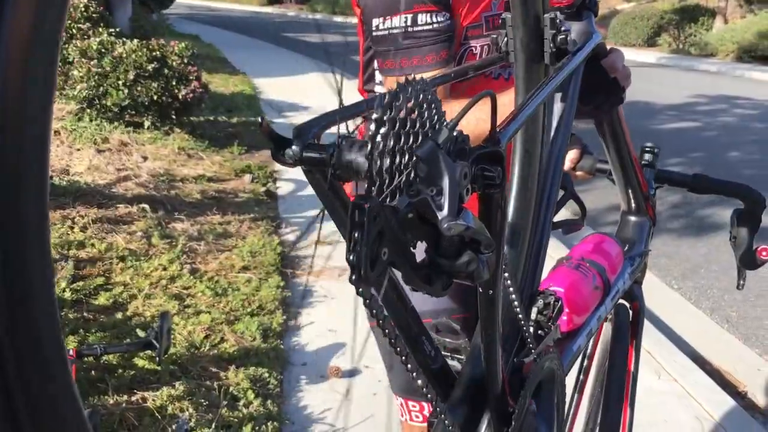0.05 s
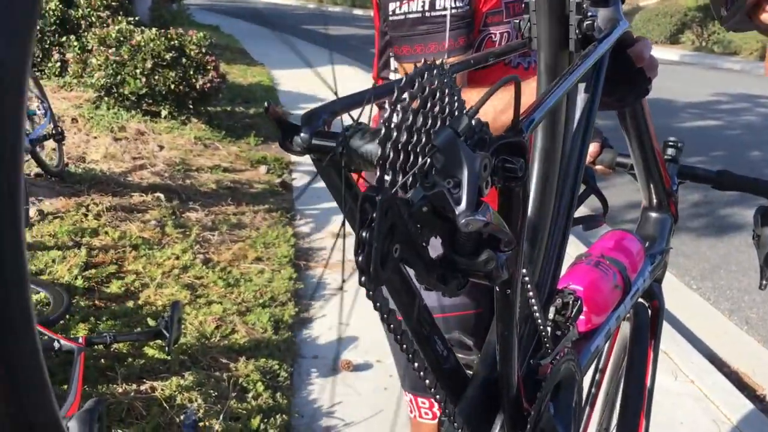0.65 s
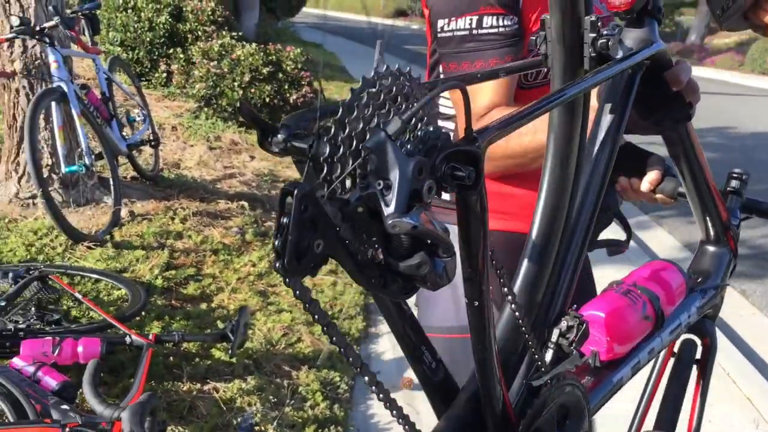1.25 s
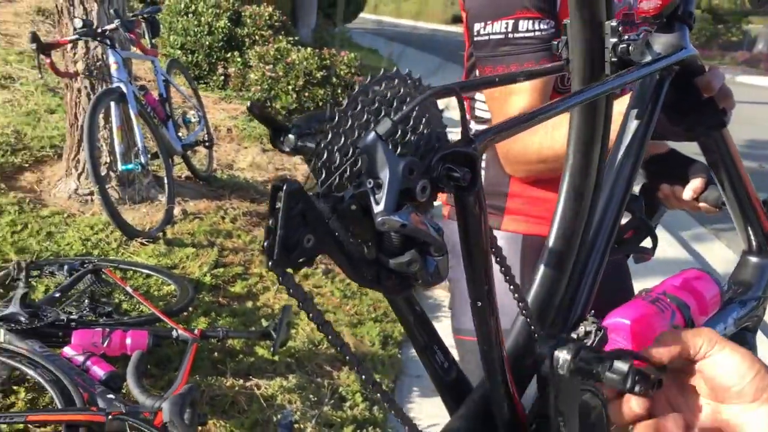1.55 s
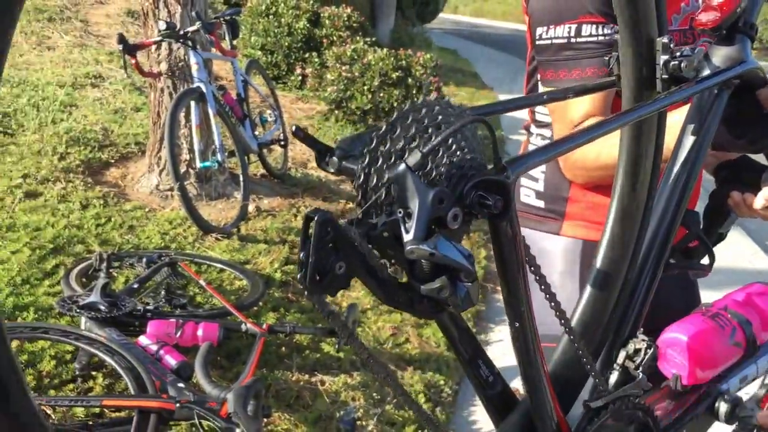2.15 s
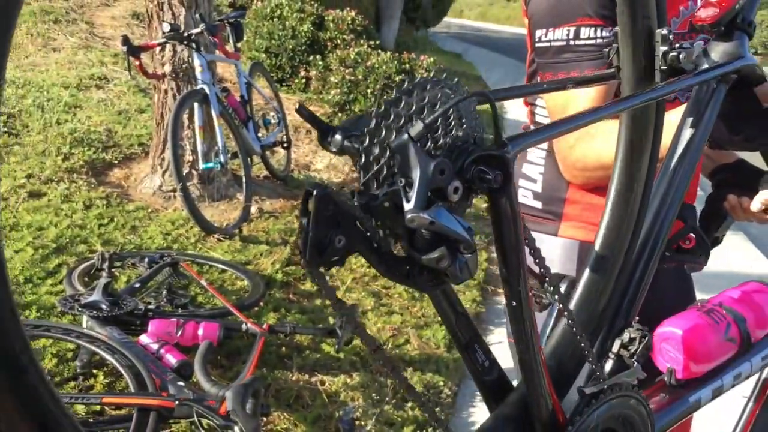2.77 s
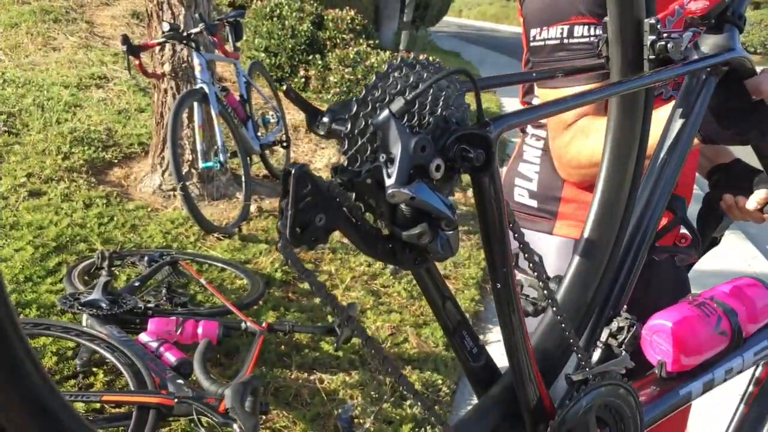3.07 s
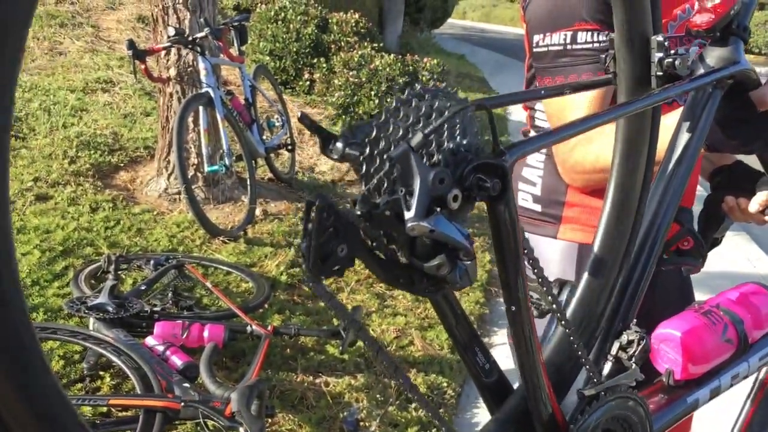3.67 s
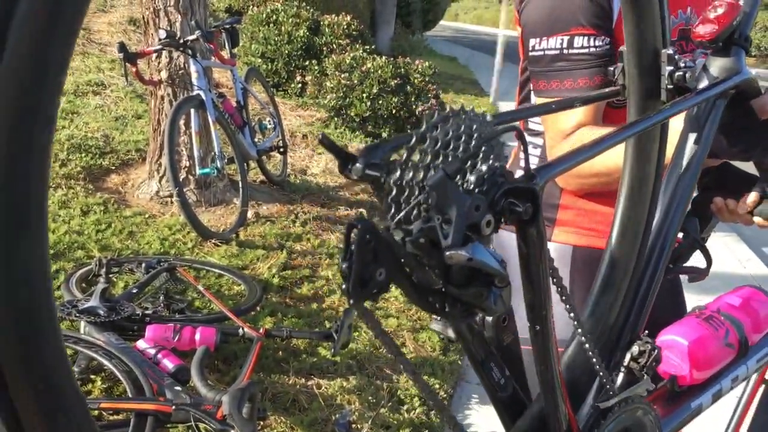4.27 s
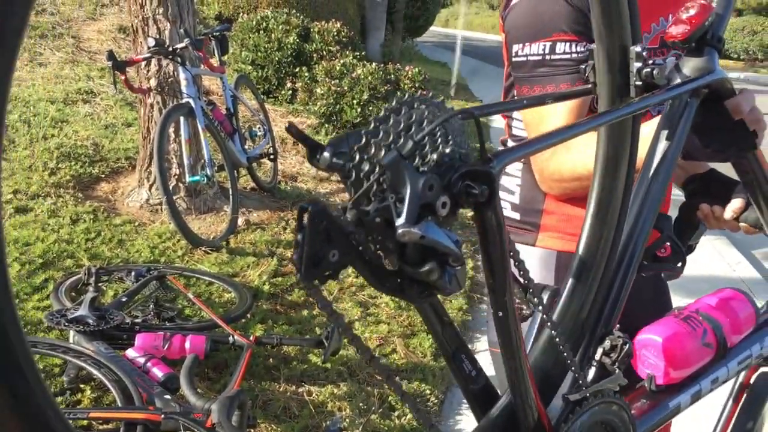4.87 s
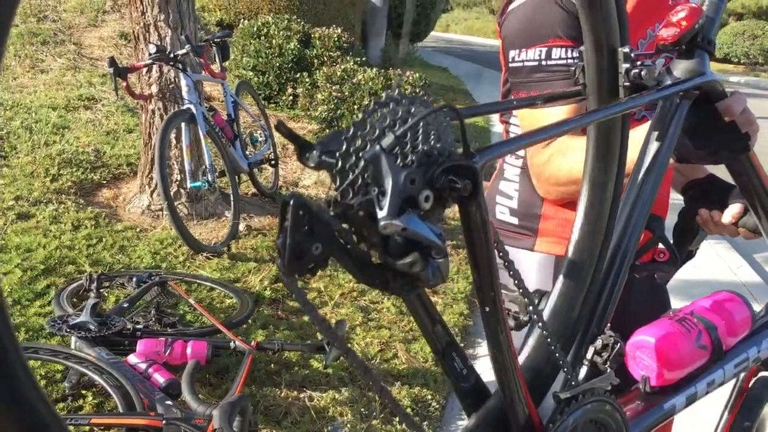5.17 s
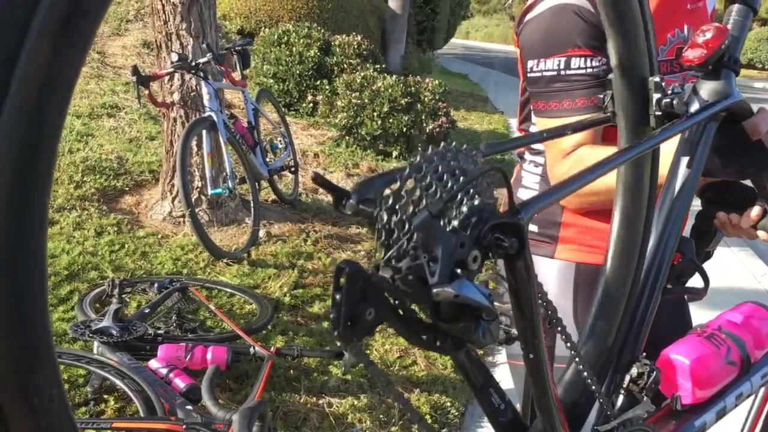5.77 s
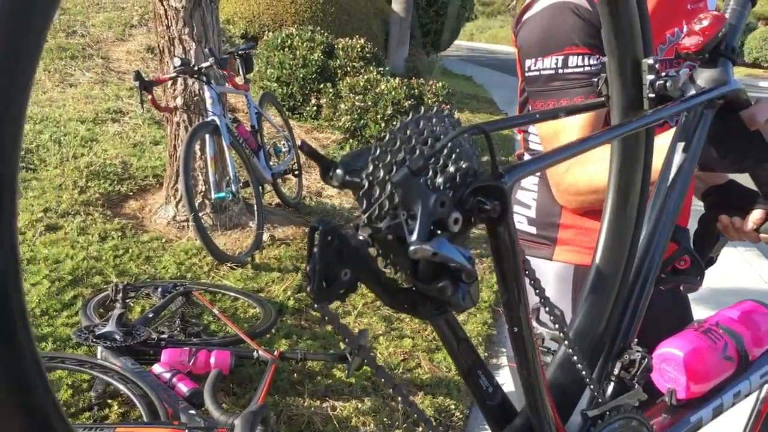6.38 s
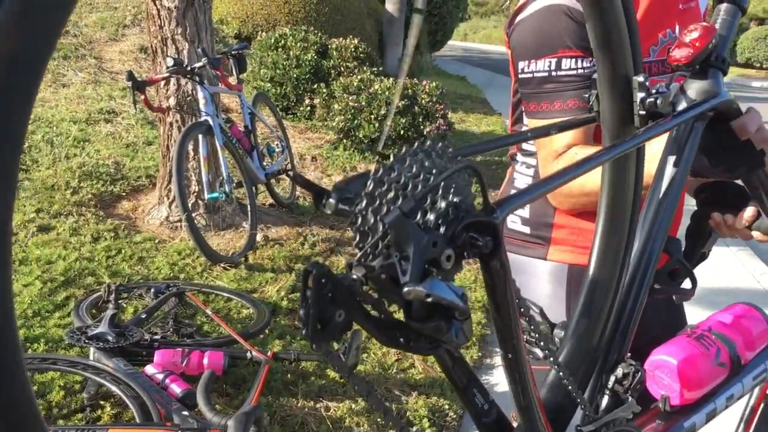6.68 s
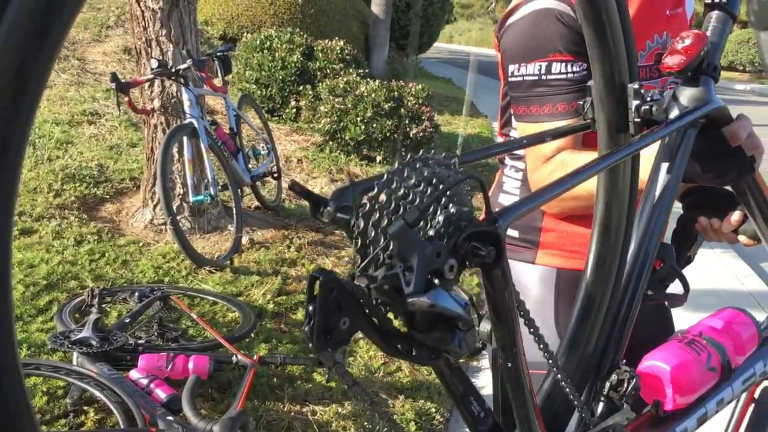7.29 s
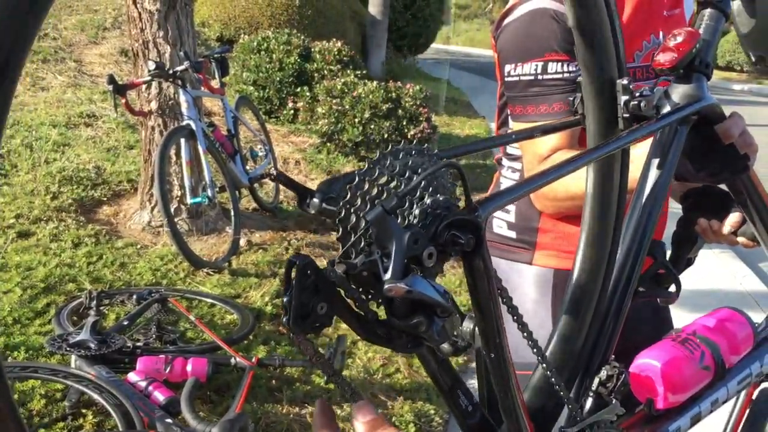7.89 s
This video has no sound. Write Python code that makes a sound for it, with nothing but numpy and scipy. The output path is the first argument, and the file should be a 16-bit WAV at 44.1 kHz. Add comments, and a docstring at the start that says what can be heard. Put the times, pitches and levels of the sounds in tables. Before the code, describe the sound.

Close ratcheting of a freewheeling bicycle hub, slowing to ticks and speeding up again, over faint distant traffic and a light breeze.

```python
"""A bicycle is held up beside a quiet road, its rear wheel spinning while the crank is worked by hand.
From the start the freehub buzzes: pawls drop over the ratchet teeth and ring the steel hub, spokes
and frame, amid faint tones and a few handling knocks. Near 2.3 s the chain gains on the wheel and
the buzz slows to single ticks, while a breeze comes up. The buzz returns and keeps changing speed;
from 3.5 s puffs of wind brush the microphone."""
import sys
import numpy as np
from scipy import signal
from scipy.fft import irfft
from scipy.io import wavfile

SR = 44100
rng = np.random.default_rng(int(sys.argv[2]) if len(sys.argv) > 2 else 0)


def int16_out(signal):
    """Quantize to a 16-bit WAV file."""
    q = np.round(np.clip(np.atleast_2d(signal).T, -1, 1) * 32767)
    wavfile.write(sys.argv[1], SR, q.astype(np.int16))


N = 350154


def from_db(db):
    return 10 ** (np.asarray(db) / 20)


def unit_rms(x):
    return x / np.sqrt(np.mean(x ** 2) + 1e-30)


def at_time(rows, at_s):
    """Each value column of a curve, read at at_s."""
    times_s, *columns = np.transpose(rows)
    return [np.interp(at_s, times_s, column) for column in columns]


def noise(colour, size):
    """Noise of rms 1, shaped by rows of Hz, dB on a log-frequency axis."""
    hz = np.fft.rfftfreq(size, 1 / SR)
    row_hz, row_db = np.transpose(colour)
    db = np.interp(np.log(hz + 1e-9), np.log(row_hz), row_db)
    return unit_rms(irfft(from_db(db) * np.exp(2j * np.pi * rng.random(len(hz))), size))


def clicks(at_s, sizes):
    """Single-sample pushes."""
    samples = np.clip(np.round(at_s * SR).astype(int), 0, N)
    return np.bincount(samples.ravel(), np.ravel(sizes), N + 1)[:N]


def ring(pushes, hz, width_hz):
    """One mode: a unit push starts a decaying sine of height 1."""
    r, w = np.exp(-np.pi * width_hz / SR), 2 * np.pi * hz / SR
    return signal.lfilter([0, np.sin(w)], [1, -2 * r * np.cos(w), r * r], pushes + 1e-18)


def fade(energy, tau_s):
    """Exponential decay of each push, its total kept."""
    r = np.exp(-1 / (tau_s * SR))
    return signal.lfilter([1 - r], [1, -r], energy + 1e-24)


def swell(centre_s, length_s):
    """Half a cosine of height 1."""
    phase = (np.arange(N) / SR - centre_s) / length_s
    return np.cos(np.pi * np.clip(phase, -.5, .5))


def road(rms_db=-57):
    """Steady rumble of far traffic."""
    # Each row: frequency in Hz, relative density in dB.
    road_colour = [(20, -46), (32, -34), (48, -2), (80, -0.5), (150, -6.5), (250, -12.5), (450, -20),
                   (1000, -17), (2000, -18), (4000, -21.5), (8000, -31), (16000, -38.5)]
    return from_db(rms_db) * noise(road_colour, N)


def wind(breeze_db=-64, breeze_from_s=1.9, breeze_rise_s=1.6):
    """A light breeze comes up and stays; puffs buffet the microphone."""
    # Each row: centre in s, length in s, level at the crest in dB.
    puffs = [(3.556, 0.058, -45.5), (3.73, 0.16, -37.5), (3.822, 0.11, -40), (3.927, 0.068, -38),
             (4.235, 0.087, -40.5), (4.337, 0.42, -49.5), (5.004, 0.095, -50), (5.16, 0.055, -48),
             (5.97, 0.17, -55), (7.096, 0.071, -53)]
    # Each row: frequency in Hz, relative density in dB.
    wind_colour = [(20, -28), (31, -0.5), (44, 2.5), (80, 1.5), (130, -4), (200, -17), (300, -42.5),
                   (600, -75), (2000, -80)]
    # Spectrum of the eddies' flutter. Each row: rate in Hz, relative density in dB.
    lump_rates = [(4, 13), (20, -11), (45, -15), (150, -70)]
    gust = sum(from_db(db) * swell(centre_s, length_s) ** 2 for centre_s, length_s, db in puffs)
    breeze = from_db(breeze_db) * np.clip((np.arange(N) / SR - breeze_from_s) / breeze_rise_s, 0, 1)
    # Small eddies come in lumps and gain on the rumble the harder it blows.
    lumps = from_db(4.5 * np.clip(noise(lump_rates, N), -2, 2))
    eddy_band = signal.butter(3, [130, 290], "band", fs=SR, output="sos")
    eddies = unit_rms(signal.sosfilt(eddy_band, rng.standard_normal(N)))
    buffets = gust * (gust / gust.max()) ** 0.41 * lumps * from_db(-17) * eddies
    return (gust + breeze) * noise(wind_colour, N) + buffets


def wheel_tones():
    """Faint tones swell and fade as the wheel turns."""
    # Each row: centre in s, length in s, frequency in Hz, rms at the crest in dB.
    tones = [(0.32, 0.18, 1835, -53.5), (0.61, 0.11, 1830, -55.5), (0.675, 0.22, 2265, -58),
             (0.874, 0.13, 1820, -56), (1.39, 0.074, 1825, -58), (6.36, 0.13, 1785, -61.5),
             (6.688, 0.085, 1790, -62), (6.546, 0.31, 2255, -59), (7.052, 0.51, 2232, -61),
             (0.753, 2.1, 291, -69.5), (1.553, 1.25, 174, -65)]
    t = np.arange(N) / SR
    return sum(np.sqrt(2) * from_db(db) * swell(centre_s, length_s) * np.sin(2 * np.pi * hz * t)
               for centre_s, length_s, hz, db in tones)


def handling_knocks():
    """Dull bumps of the handled bicycle, dead within a few cycles."""
    # Each row: start in s, level in dB, frequency in Hz, width in Hz.
    knocks = [(0.2909, -39, 370, 130), (.3865, -30.5, 252, 100), (0.3882, -37, 480, 332),
              (0.3868, -37.5, 950, 160), (1.857, -43.5, 330, 150)]
    return sum(ring(clicks(np.array([start_s]), from_db([db])), hz, width_hz)
               for start_s, db, hz, width_hz in knocks)


def mode_clusters(drop_s, sizes, modes, t60_s, rise_s, early_boost, swing, uneven,
                  teeth_per_turn=24, count=4, size=8192):
    """Drops ring clusters of close modes; their mix goes round with the wheel."""
    age_s, hz = np.arange(size) / SR, np.fft.rfftfreq(size, 1 / SR)
    power = sum((from_db(db) / (1 + ((hz - mode_hz) / width_hz) ** 2)) ** 2
                for mode_hz, width_hz, db in modes)
    colour = np.c_[hz, 10 * np.log10(power)][1:]
    attack = (1 - np.exp(-age_s / rise_s)) * (1 + early_boost * np.exp(-age_s / 0.0081))
    envelope = attack * np.exp(-np.log(1000) * age_s / t60_s)
    turns, out = np.arange(len(drop_s)) / teeth_per_turn, np.zeros(N)
    for k in range(count):
        response = noise(colour, size) * envelope
        response *= np.sqrt(SR / np.sum(response ** 2))
        facing = 1 + swing * np.cos(2 * np.pi * (turns - k / count))
        facing += uneven * rng.standard_normal(len(drop_s))
        facing /= np.sqrt(count * (1 + swing ** 2 / 2 + uneven ** 2))
        out += signal.oaconvolve(clicks(drop_s, sizes * facing), response)[:N]
    return out


def frame_and_spokes(drop_s, shove):
    """Frame and spokes answer each drop later than the hub and ring longer."""
    # Each row of both: centre in Hz, half-width in Hz, relative level in dB.
    frame_modes = [(281, 8.9, -8), (387.4, 9.3, -10), (634.4, 27, -10), (1063, 29, -9), (1387, 21.6, 0.5),
                   (1577, 77, -8.5), (1690, 94, -5.5), (1760, 61, -3.5), (2000, 216, -2.5), (2230, 99, 3.5),
                   (2450, 39, -8.5), (2630, 42, 2), (2710, 180, -9.5)]
    spoke_modes = [(2955, 66, -0.5), (3257, 216, 0.5), (3624, 91, 4), (3940, 220, 2), (4200, 82, -3.5),
                   (4550, 130, -7.5)]
    # Each row: time in s, frame gain in dB, spoke gain in dB.
    # The frame leads until the derailleur swings across.
    ring_gains = [(0, -70.8, -72), (.7, -69.5, -69.5), (1.24, -67, -72.5), (1.34, -73, -73),
                  (1.5, -70, -69), (2.7, -71, -68), (4.0, -71, -68.5), (4.8, -72, -69.5), (5.6, -71, -69),
                  (6.35, -72.5, -69.8), (6.47, -71, -69.5), (7.94, -71, -69)]
    frame_db, spoke_db = at_time(ring_gains, drop_s)
    frame = mode_clusters(drop_s, shove * from_db(frame_db), frame_modes, t60_s=0.1,
                          rise_s=0.0015, early_boost=0.58, swing=0.83, uneven=0.71)
    spokes = mode_clusters(drop_s, shove * from_db(spoke_db), spoke_modes, t60_s=0.076,
                           rise_s=0.00086, early_boost=0.25, swing=1.38, uneven=1.2)
    return frame + spokes


def contact_envelope(contact_s, sizes, crack_s, rattle_s, rattle_share, tail_share, tail_t60_s=0.037):
    """Fine motion after each contact: a crack, a brief rattle, a short tail."""
    energy = clicks(contact_s, sizes ** 2) * SR
    early = (1 - rattle_share) * fade(energy, crack_s) + rattle_share * fade(energy, rattle_s)
    tail = fade(energy, tail_t60_s / np.log(10 ** 6))
    return np.sqrt((1 - tail_share) * early + tail_share * tail)


def hub_ring(contact_s, sizes):
    """Contacts ring the steel shell and cogs, which radiate around their modes."""
    # Each row: frequency in Hz, width in Hz, relative level in dB.
    hub_modes = [(8800, 390, -6), (9170, 178, 13), (9200, 230, -19)]
    rattle = contact_envelope(contact_s, sizes, crack_s=0.00024, rattle_s=0.00099,
                              rattle_share=0.25, tail_share=0.21)
    total_power = sum(from_db(db) ** 2 for _, _, db in hub_modes)
    shell = np.zeros(N)
    for hz, width_hz, db in hub_modes:
        gain = from_db(db) * 2 * np.sqrt(np.pi * width_hz / SR / total_power)
        shell += gain * ring(rattle * rng.standard_normal(N), hz, width_hz)
    return signal.sosfilt(signal.butter(1, [7600, 10900], "band", fs=SR, output="sos"), shell)


def pawl_cracks(contact_s, sizes):
    """Each contact of a pawl gives a bright crack."""
    # Each row: frequency in Hz, relative density in dB.
    pawl_colour = [(1200, -21.5), (3700, 0), (4950, -11.5), (5700, -4), (6250, -3), (6800, 3), (7300, 3),
                   (8300, 1.5), (9600, 8.5), (10450, -13.5), (11200, 0), (13200, -3), (14700, 3.5),
                   (15800, -4)]
    return noise(pawl_colour, N) * contact_envelope(contact_s, sizes, crack_s=0.00051, rattle_s=0.00079,
                                                    rattle_share=0.59, tail_share=0.77)


def pawl_drops(jitter_s=0.00003, uneven_db=1.67, usual_teeth_per_s=70):
    """One drop per tooth passed, a little harder at speed: time, strength, accent."""
    # The wheel's lead over the cogs. Each row: time in s, speed in teeth per s.
    ratchet_speed = [(0.0, 69.74), (0.22, 82.38), (0.84, 81.47), (1.54, 52.17), (1.78, 58.65),
                     (2.02, 47.74), (2.32, 28.49), (2.47, 36.19), (2.65, 33.17), (2.76, 41.02),
                     (2.9, 71.91), (3.09, 77.68), (3.43, 75.74), (4.16, 97.61), (4.25, 89.8), (4.55, 52.01),
                     (4.77, 48.92), (5.1, 74.75), (5.31, 59.52), (5.34, 74.72), (5.72, 93.07),
                     (5.92, 47.48), (6.03, 41.13), (6.15, 56.19), (6.31, 56.86), (6.36, 66.79),
                     (6.75, 83.75), (6.83, 78.66), (7.11, 85.72), (7.54, 65.74), (7.94, 65.42)]
    # Teeth that snap much harder. Each row: time in s, accent in dB.
    hard_teeth = [(0.11, 7.2), (1.971, 4.5), (1.992, 3.3), (2.293, 3.4), (2.594, 6.2), (2.653, 3.1),
                  (2.783, 5.7), (2.804, 3.6), (3.557, 6.9), (3.798, 5.5), (3.877, 7.7), (4.114, 6.3),
                  (4.529, 7.2), (4.785, 4.6), (5.58, 6.4), (5.906, 3.3), (6.04, 6.3), (7.315, 6.5),
                  (7.354, 7.8), (7.367, 8.0)]
    teeth_per_s, = at_time(ratchet_speed, np.arange(N) / SR)
    teeth_passed = np.floor(np.cumsum(teeth_per_s) / SR)
    samples = np.flatnonzero(np.diff(teeth_passed, prepend=-1))
    drop_s = samples / SR
    accent_db = uneven_db * np.clip(rng.standard_normal(len(samples)), -2, 1.7)
    for at_s, db in hard_teeth:
        accent_db[np.argmin(abs(drop_s - at_s))] = db
    strength = (teeth_per_s[samples] / usual_teeth_per_s) ** 0.13
    return drop_s + jitter_s * rng.standard_normal(len(drop_s)), strength, accent_db


def pawl_bounces(drop_s, strength, mean_gap_s=0.00052, loss_db=2.5, spread_db=1.7, count=5):
    """Pawls land a moment apart and bounce, weakening; rows are drops, columns contacts."""
    shape = (len(drop_s), count)
    delay_s = np.cumsum(mean_gap_s * rng.exponential(1, shape), axis=1)
    sizes = from_db(spread_db * rng.standard_normal(shape) - loss_db * np.arange(count))
    sizes /= np.linalg.norm(sizes, axis=1, keepdims=True)
    return drop_s[:, None] + delay_s - delay_s[:, :1], sizes * strength[:, None]


def freehub(pawl_db=-62, hub_db=-62.5):
    """The same drops drive pawls, hub, frame and spokes; a hard tooth shows most in the hub."""
    drop_s, strength, accent_db = pawl_drops()
    contact_s, sizes = pawl_bounces(drop_s, strength)
    pawls = pawl_cracks(contact_s, sizes * from_db(pawl_db + 0.42 * accent_db[:, None]))
    hub = hub_ring(contact_s, sizes * from_db(hub_db + accent_db[:, None]))
    return pawls + hub + frame_and_spokes(drop_s, strength * from_db(0.054 * accent_db))


def scene():
    """The bicycle close by in open air, mono."""
    return (freehub() + handling_knocks() + wheel_tones() + wind() + road())[None]


def record(dry):
    """Steep low-pass at 15.9 kHz."""
    return signal.sosfilt(signal.ellip(12, .1, 80, 15900, fs=SR, output="sos"), dry)


dry = scene()
out = record(dry)
int16_out(out)
```